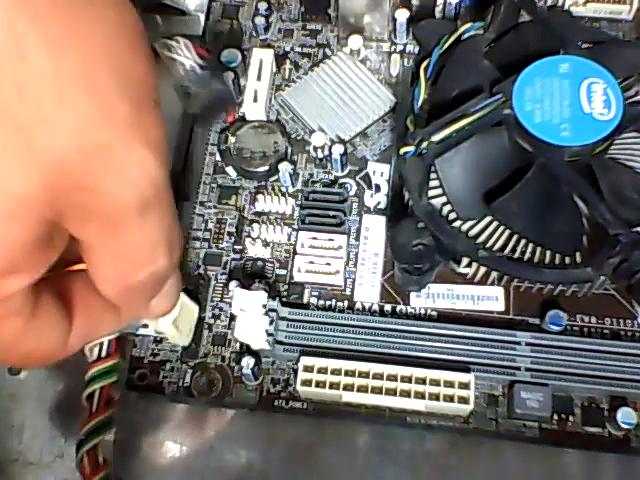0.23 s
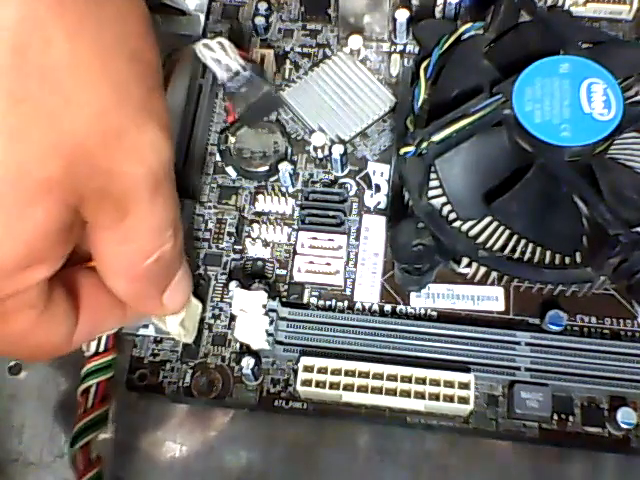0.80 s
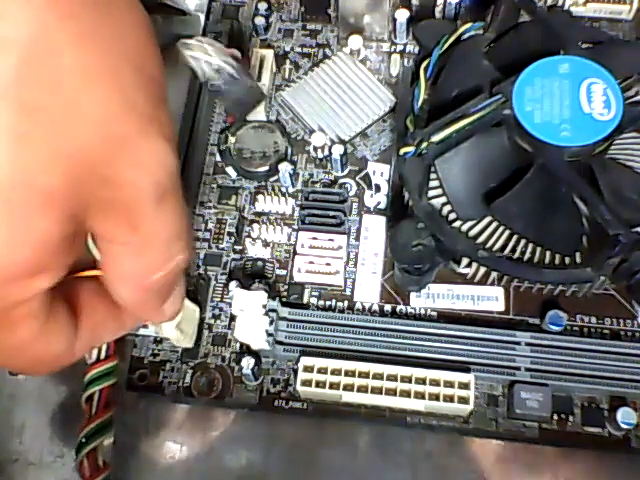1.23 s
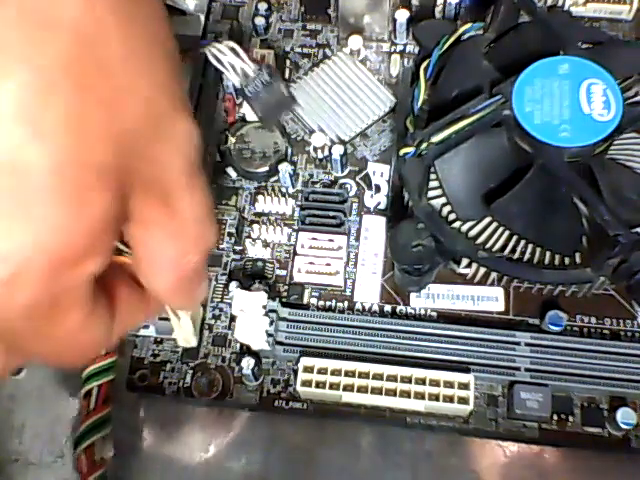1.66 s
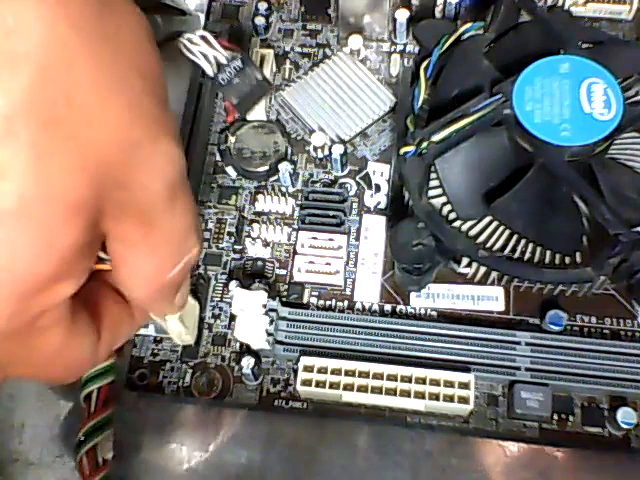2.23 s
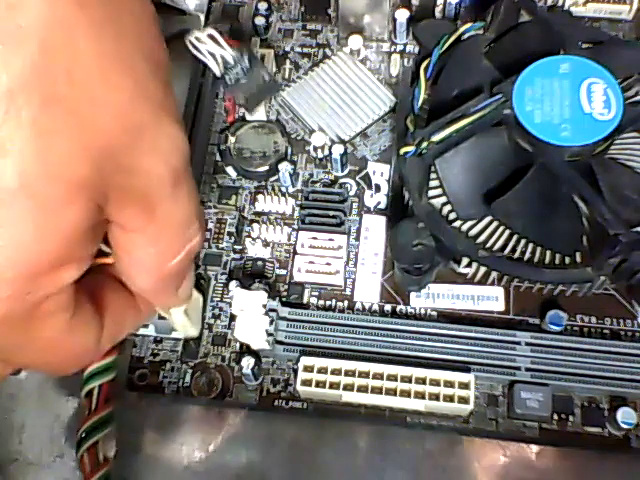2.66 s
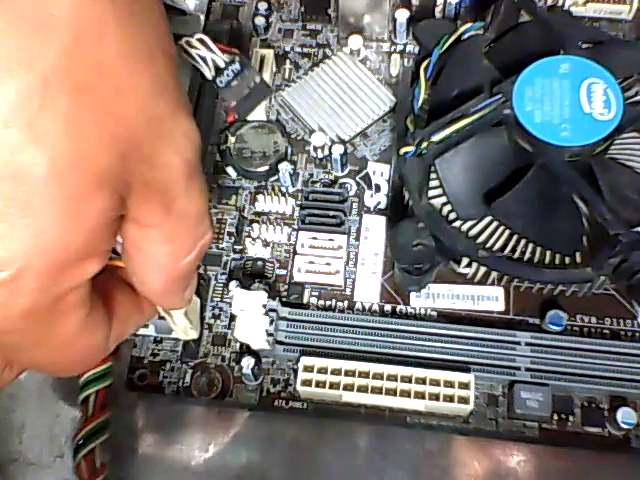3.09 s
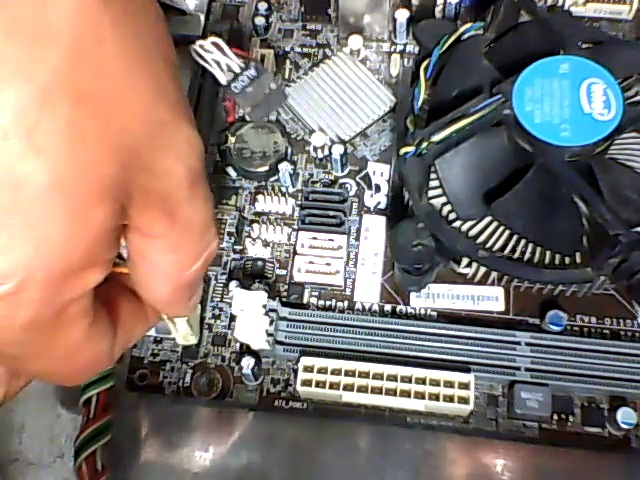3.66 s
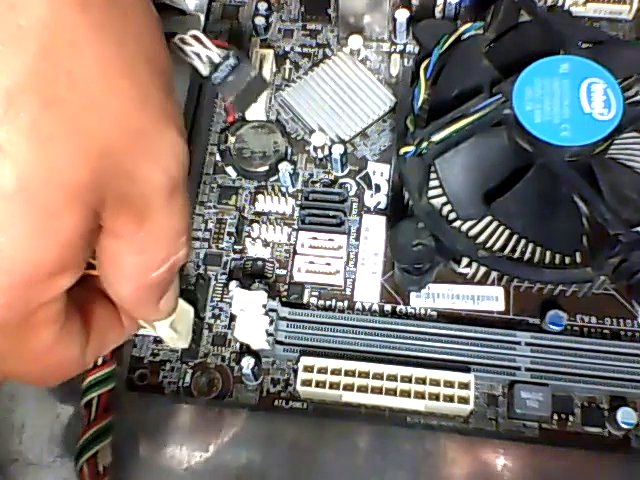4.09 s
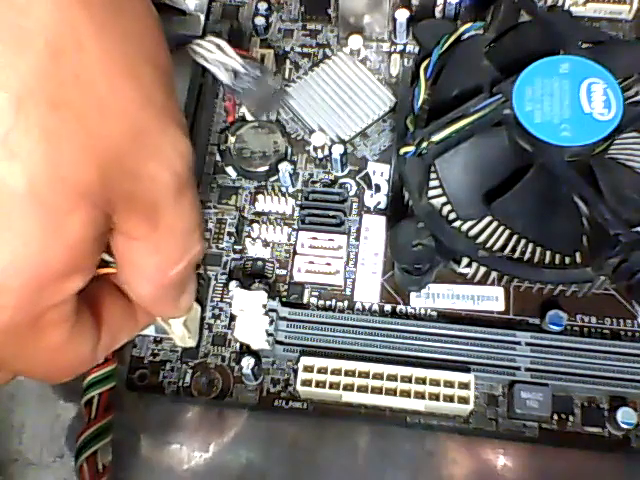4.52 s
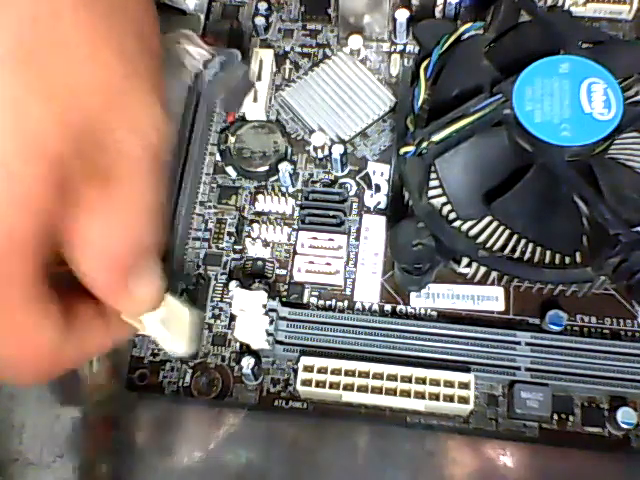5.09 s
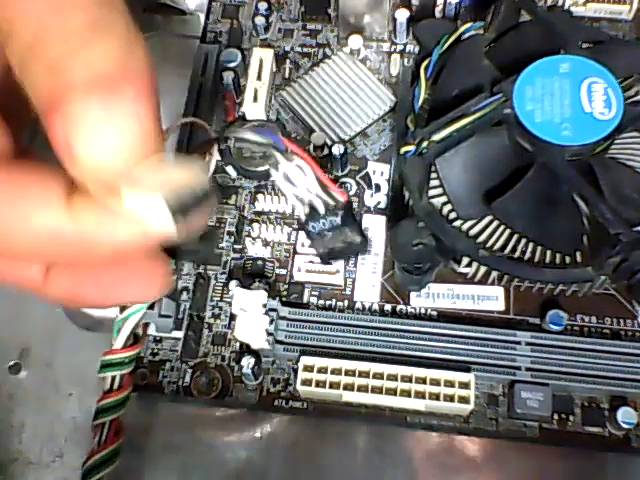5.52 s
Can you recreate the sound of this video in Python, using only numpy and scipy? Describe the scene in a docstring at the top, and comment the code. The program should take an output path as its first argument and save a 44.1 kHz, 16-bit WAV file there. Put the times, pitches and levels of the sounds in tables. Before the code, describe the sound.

A small plastic plug clicks, snaps and rubs against a computer motherboard socket, over room rumble and a faint high whine.

```python
"""A small plastic power plug, worked by hand against its motherboard socket close to the microphone.
Each contact snaps, rings the plug and a metal part, and knocks the board and the steel sheet beneath it.
A loose connector swings against the board; plastic rubs and squeaks, and the hand drags the plug away.
Behind it lie room rumble, mains hum and a far engine heard through the walls. The camera's own
electrical whine, pulsed by its frames, leaks into the microphone."""
import sys
import numpy as np
from scipy import signal
from scipy.fft import rfft, irfft, next_fast_len
from scipy.io import wavfile
from scipy.ndimage import uniform_filter1d

SR = 44100
rng = np.random.default_rng(int(sys.argv[2]) if len(sys.argv) > 2 else 0)


def pcm_store(signal):
    """Save signal as 16-bit PCM."""
    levels = np.round(np.clip(np.atleast_2d(signal), -1, 1) * 32767)
    wavfile.write(sys.argv[1], SR, levels.astype(np.int16).T)


N = 250223
TIME = np.arange(N) / SR
RING_TIME = TIME[:SR * 3 // 4]
EDGE_DB, EDGE_REF_HZ, EDGE_DB_PER_OCTAVE = -3.5, 2400, 4.5  # a smaller, higher edge rings more clearly


# Plug on socket, close up: t/s, strength/dB, sharpness/dB, relative metal level/dB, edge f/Hz
PLUG_CONTACTS = [(.008, -42, -23, -21, 2700), (.066, -45.5, -17, -13, 2420), (0.2488, -35.5, 6, -8, 5860),
                 (0.2657, -32, 1.5, -13, 2106), (1.034, -47, 0, -11, 6700), (1.305, -30.5, 2.5, -22, 1970),
                 (1.416, -44.5, -3, -16, 2600), (2.3437, -34.5, 7.5, -1.5, 2810),
                 (2.641, -44.5, 1, -14, 6750), (2.845, -44.5, -5, -14, 2450), (2.872, -37, 8, 0.5, 2220),
                 (3.592, -37, 0.5, -9.5, 2580), (3.9693, -29, -3.5, -8, 2300),
                 (4.0066, -41.5, 8.5, 4.5, 5300), (5.153, -34, 0, -12.5, 1390), (5.244, -38, 4, -23, 1460)]
def plug_clicks():
    """Each contact sets off four sounds; a sharper one snaps more and shakes the board less."""
    out = np.zeros(N)
    for start, db, sharp_db, metal_db, edge_hz in PLUG_CONTACTS:
        edge_db = EDGE_DB + EDGE_DB_PER_OCTAVE * np.log2(edge_hz / EDGE_REF_HZ)
        click = undb(-2.5 - 0.092 * sharp_db) * board_thud()
        click += undb(1) * plug_clack(edge_hz, edge_db)
        click += undb(1.5 + metal_db) * metal_ring()
        click += undb(0.5 + sharp_db) * edge_snap()
        add(out, start, undb(db) * click)
    return out


# Modes of plug and socket: f/Hz, relative level/dB, t60/s
PLUG_MODES = [(2020, -8, 0.04), (2226, -6.5, 0.12), (2480, 1, 0.07), (2850, 5.5, 0.074), (3056, -1.5, 0.18),
              (3780, 0.5, 0.1), (3950, -2, 0.091), (6700, -22, 0.17), (6200, -4, .08)]
# Their dense resonances: f/Hz, relative level/dB
CLACK_SPECTRUM = [(300, -16), (1000, -2), (2400, 5), (3400, -1), (4500, -4.5), (6600, -4), (9000, -9.5),
                  (16000, -19)]
def plug_clack(edge_hz, edge_db):
    """The plastic housing strikes the socket; the edge that touches adds its own brief resonance."""
    dense = unit(burst(CLACK_SPECTRUM, t60=0.032, tail_db=-6, tail_t60=0.19), count=440)
    housing = ring(PLUG_MODES, spread_db=3)
    edge = ring([(.96 * edge_hz, -2, .04), (1.03 * edge_hz, 0, .05)], spread_db=1)
    return unit(dense + undb(-7) * housing + undb(edge_db) * edge, count=440)


# Bright crack at close range: f/Hz, relative level/dB
SNAP_SPECTRUM = [(1500, -15), (5000, -12), (8000, -2.5), (11500, 3.5), (14000, 0), (16000, -10.5)]
def edge_snap():
    """A plastic edge lets go with a sharp crack."""
    return unit(burst(SNAP_SPECTRUM, t60=0.016, tail_db=-15.5, tail_t60=0.11), count=220)


# Metal part on the board: f/Hz, relative level/dB, t60/s
METAL_MODES = [(4850, -1, 0.14), (5000, -6, 0.11), (5050, -8, 0.081), (5390, -5.5, 0.13), (5700, -9, .1)]
def metal_ring():
    """A small metal part chatters in its seat while it rings out."""
    spectrum = [(3800, -17), (4800, 0.5), (5600, -9), (6600, -28)]
    chatter = unit(burst(spectrum, t60=0.14, tail_db=-18, tail_t60=0.17), count=600)
    return unit(ring(METAL_MODES, spread_db=8) + undb(-2) * chatter, count=600)


# Board and steel sheet under the plug: f/Hz, relative level/dB, t60/s
BOARD_MODES = [(330, -3.5, 0.17), (474.6, -6.5, 0.43), (776, -0.5, 0.21), (866, -5, 0.25),
               (957, -13, 0.099), (992, 0.5, 0.34), (1063, -6.5, 0.41), (1123, 1, 0.2), (1272, -7.5, 0.15),
               (1498, -3.5, 0.1), (1740, -14, 0.13)]
# Dense, short resonances between those modes: f/Hz, relative level/dB
BOARD_SPECTRUM = [(60, -15), (170, 0), (280, -0.5), (480, -2.5), (620, -4.5), (780, -1.5), (1000, -0.5),
                  (1350, -5.5), (1900, -11), (3200, -19.5), (8000, -26.5)]
def board_thud():
    """Board and sheet take a few milliseconds to start moving; the table booms on beneath them."""
    dense = unit(burst(BOARD_SPECTRUM, t60=0.18, tail_db=-14, tail_t60=0.72), count=600)
    table_spectrum = [(70, -24), (150, -0.5), (230, -4), (400, -9), (900, -43)]
    boom = colour(rng.standard_normal(len(RING_TIME)), table_spectrum) * fade(t60=1.46)
    modes = ring(BOARD_MODES, spread_db=2.5)
    swell = 1 - fade(t60=0.0061)
    return unit((dense + undb(-2) * modes + undb(-14) * boom) * swell, count=1300)


# Only a corner of the plug catches: t/s, level/dB
CORNER_CATCHES = [(.024, -44), (.711, -44), (1.004, -46), (1.465, -42), (3.2975, -32.5), (4.0132, -34.5),
                  (5.211, -33)]
def corner_ticks():
    """Light catches are nearly all snap; they hardly stir the metal or the board."""
    out = np.zeros(N)
    for start, db in CORNER_CATCHES:
        tick = edge_snap() + undb(-18.5) * metal_ring() + undb(-17.5) * board_thud()
        add(out, start, undb(db) * tick)
    return out


# Low board thuds, some under the plug's clicks, some alone as soft bumps: t/s, level/dB
LOW_THUDS = [(.25, -41.5), (.268, -36.5), (.365, -46.5), (.442, -42.5), (1.316, -31.5), (1.342, -39.5),
             (1.668, -49), (2.885, -36.5), (4.012, -37), (4.6, -49.5), (4.85, -44.5), (5.342, -39)]
def low_thuds():
    """The board thuds dully, with only a trace of the plastic."""
    out = np.zeros(N)
    for start, db in LOW_THUDS:
        thud = board_thud() + undb(-15) * plug_clack(EDGE_REF_HZ, EDGE_DB)
        add(out, start, undb(db) * thud)
    return out


# A loose connector hits the board: t/s, level/dB
CONNECTOR_HITS = [(1.4165, -35), (1.795, -49), (2.0635, -33.5), (3.8775, -36.5), (4.067, -39), (5.104, -41),
                  (5.54, -43)]
# Its hollow shell: f/Hz, relative level/dB, t60/s
SHELL_MODES = [(733, 5, 0.21), (827, -8, 0.11), (1146, -7, 0.047), (1340, 8, 0.032), (1477, -4, 0.16)]
# Its blunt contact: f/Hz, relative level/dB
SHELL_SPECTRUM = [(250, -10), (750, 6), (1350, 2.5), (2000, -11), (4000, -17), (9000, -42)]
def connector_knocks():
    """The swinging shell gives hollow tocks with a quick attack and little treble."""
    out = np.zeros(N)
    for start, db in CONNECTOR_HITS:
        contact = unit(burst(SHELL_SPECTRUM, t60=0.015, tail_db=-9, tail_t60=.2), count=440)
        tock = unit(ring(SHELL_MODES, spread_db=2) + undb(3) * contact, count=440)
        add(out, start, undb(db) * tock)
    return out


# Plug and wires sliding near the microphone: t/s, length/s, level/dB
STROKES = [(0.0, .066, -42.5), (.99, .041, -46), (1.406, .11, -47), (1.757, 0.078, -45),
           (5.143, 0.118, -35), (5.293, 0.14, -37.5), (5.438, .14, -43.5)]
# Their friction noise: f/Hz, relative level/dB
RUB_SPECTRUM = [(300, -7), (1500, 3), (3000, 1), (6500, -2), (11000, 3), (14500, -3), (16000, 3.5)]
def plug_rubs(slips_per_s=12000, ramp_share=0.42):
    """Sliding plastic catches in many tiny slips, which also shake the board, damped by the hand."""
    pressure = np.zeros(N)
    for start, length, db in STROKES:
        add(pressure, start, undb(db) * signal.windows.tukey(int(length * SR), ramp_share))
    slips = rng.standard_normal(N) * (rng.random(N) < slips_per_s / SR)
    slips = unit(slips * undb(2 * drift(180)))
    board = burst(BOARD_SPECTRUM, t60=0.081, tail_db=-14, tail_t60=0.33)
    shake = signal.fftconvolve(slips * pressure, board / np.linalg.norm(board))[:N]
    return pressure * colour(slips, RUB_SPECTRUM) + undb(-5.5) * shake


# Plastic under the fingers: t/s, length/s, f/Hz, level/dB
FINGER_SLIPS = [(.485, .16, 10450, -58), (4.125, .135, 4050, -58)]
def finger_squeaks(sag_share=.035, wobble_share=0.01, jitter_hz=189):
    """Fast stick-slip gives a thin, unsteady tone; level and pitch follow the finger's pressure."""
    out = 0
    for start, length, hz, db in FINGER_SLIPS:
        progress = np.clip((TIME - start) / length, 0, 1)
        pressure = np.sqrt(np.abs(np.sin(np.pi * progress)))
        pitch = hz * (1 - sag_share * (1 - pressure) + wobble_share * drift(40)) + jitter_hz * drift(500)
        out += np.sqrt(2) * undb(db) * pressure * np.sin(2 * np.pi * np.cumsum(pitch) / SR)
    return out


def hand_rumble():
    """The hand lifts away close to the microphone, with a soft low rumble."""
    db = np.interp(TIME, [5.0, 5.15, 5.38, 5.67], [-84, -46.5, -36.5, -39.5])
    spectrum = [(15, -2), (52, 0), (110, -11.5), (280, -11), (500, -21.5), (2000, -37.5)]
    return undb(db) * colour(rng.standard_normal(N), spectrum)


# Far off outside, the engine's strongest overtone, dipping as it eases off: t/s, f/Hz, level/dB
ENGINE_PASS = [(4.03, 163, -46), (4.3, 165, -48), (4.6, 166.9, -45.5), (4.7, 161, -49), (5.0, 165.5, -47),
               (5.33, 171, -42.5), (5.67, 171.3, -46.5)]
# Its partials: multiple of that overtone, relative level/dB
ENGINE_PARTIALS = [(.5, -16), (1, 0), (1.25, -8), (1.5, -9), (1.75, -14.5)]
def far_engine(approach_db_per_s=31, rise_hz_per_s=30):
    """An engine nears, speeds up and pulls away; only its low overtones come through the walls."""
    times, hz, db = np.transpose(ENGINE_PASS)
    early_s = np.clip(times[0] - TIME, 0, 2)
    pitch = np.interp(TIME, times, hz) - rise_hz_per_s * early_s
    level_db = np.interp(TIME, times, db) - approach_db_per_s * early_s
    phase = 2 * np.pi * np.cumsum(pitch * (1 + 0.0078 * drift(15))) / SR
    tones = sum(undb(rel_db + 1.26 * drift(11)) * np.sin(k * phase) for k, rel_db in ENGINE_PARTIALS)
    return np.sqrt(2) * undb(level_db) * tones


# Mains overtones in the room: f/Hz, relative level/dB
MAINS_TONES = [(301.5, -61), (360.7, -59), (419.9, -59.5), (479.1, -61.5), (538.3, -60.5), (597.5, -65.5)]
def mains_hum():
    """The mains buzz faintly, each overtone wavering in level."""
    hum = 0
    for hz, db in MAINS_TONES:
        hum += undb(db + 2.5 * drift(3.08)) * np.sin(2 * np.pi * (hz * TIME + rng.random()))
    return undb(0.5) * hum


# Noise floor at the microphone: f/Hz, relative level/dB
ROOM_SPECTRUM = [(15, 24.5), (45, 23), (75, 17), (130, 14), (250, 13), (400, 4.5), (620, 4.5), (950, 2),
                 (1600, -2), (3000, -5), (6000, -8), (10000, -6.5), (15500, -9.5)]
def room_tone():
    """Steady room rumble and microphone hiss."""
    return undb(-40) * colour(rng.standard_normal(N), ROOM_SPECTRUM)


# Whine inside the camera: f/Hz, relative level/dB added while a frame is sent, steady relative level/dB
WHINE_TONES = [(8000, -40.6, -71), (15000, -42.6, -60)]
def camera_whine(frame_hz=15, first_frame_s=.0087, send_s=.0327):
    """Data bursts leak into the microphone: two tones jump up with each frame and the supply steps."""
    sending = (TIME - first_frame_s) * frame_hz % 1 < send_s * frame_hz
    gate = uniform_filter1d(sending * 1., size=10)
    tones = sum((undb(steady_db) + gate * undb(send_db)) * np.sin(2 * np.pi * hz * TIME)
                for hz, send_db, steady_db in WHINE_TONES)
    # the input capacitor lets only the edges of the supply step through
    steps = signal.sosfilt(signal.butter(1, 14, "high", fs=SR, output="sos"), gate)
    return np.sqrt(2) * undb(-0.28) * tones + undb(-33) * steps


def ring(modes, spread_db):
    """Decaying modes; grip and contact point shift their levels and pitches on every blow."""
    out = 0
    for hz, db, t60 in modes:
        pitch = hz + rng.uniform(-12, 12)
        gain = undb(db + spread_db * rng.standard_normal())
        out += gain * fade(t60) * np.sin(2 * np.pi * (pitch * RING_TIME + rng.random()))
    return unit(out, count=600)


def burst(spectrum, t60, tail_db, tail_t60):
    """Dense resonances that die fast, with a weaker, longer tail."""
    envelope = fade(t60) + undb(tail_db) * fade(tail_t60)
    return colour(rng.standard_normal(len(RING_TIME)), spectrum) * envelope


def fade(t60):
    """Free decay of a struck thing, 60 dB in t60 seconds."""
    return np.exp(-np.log(1000) * RING_TIME / t60)


def colour(x, spectrum):
    """Filter by an outline of f/Hz, level/dB, then scale to rms 1."""
    hz, db = np.transpose(spectrum)
    size = next_fast_len(len(x))
    bins = np.maximum(np.arange(size // 2 + 1) * SR / size, 1)
    gain = undb(np.interp(np.log(bins), np.log(hz), db))
    return unit(irfft(rfft(x, size) * gain, size)[:len(x)])


def drift(rate_hz):
    """Smooth random drift with rms 1."""
    hold = int(SR / rate_hz)
    steps = np.repeat(rng.standard_normal(N // hold + 1), hold)
    return unit(uniform_filter1d(steps, hold)[:N])


def add(track, start_s, sound):
    """Mix a sound in at a given time."""
    i = int(start_s * SR)
    track[i:i + len(sound)] += sound[:N - i]


def unit(x, count=None):
    """Scale to rms 1 over the first count samples."""
    return x / np.sqrt(np.mean(x[:count] ** 2) + 1e-18)


def undb(db):
    """Decibels to gain."""
    return 10 ** (np.asarray(db) / 20)


def scene():
    """One microphone close to the board, with the room behind."""
    contacts = plug_clicks() + corner_ticks() + low_thuds() + connector_knocks()
    handling = plug_rubs() + finger_squeaks() + hand_rumble()
    background = far_engine() + mains_hum() + room_tone() + camera_whine()
    return (contacts + handling + background)[None]


def record(dry, top_hz=15800):
    """The recorder cuts the top treble steeply."""
    return signal.sosfilt(signal.ellip(10, .2, 70, top_hz, fs=SR, output="sos"), dry)


dry = scene()
out = record(dry)
pcm_store(out)
```